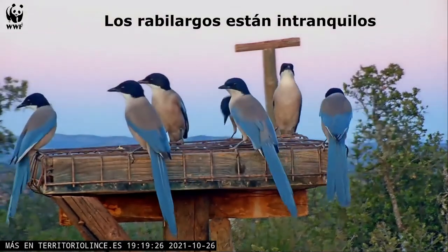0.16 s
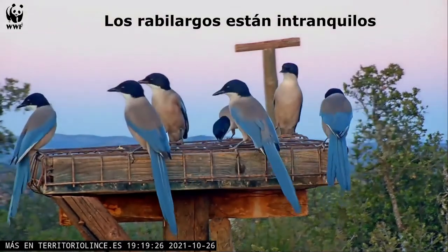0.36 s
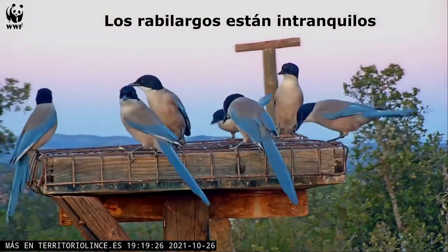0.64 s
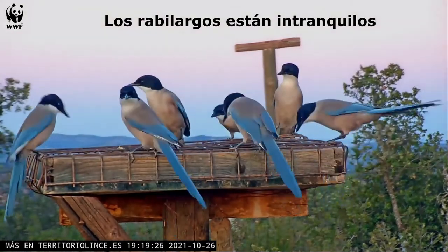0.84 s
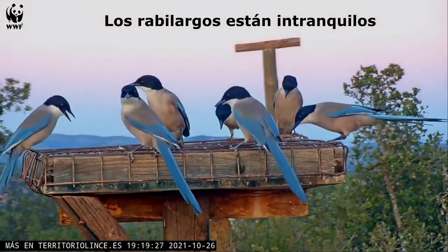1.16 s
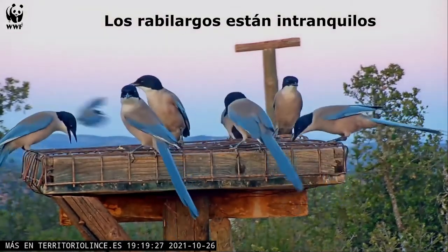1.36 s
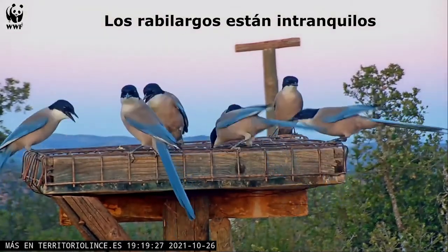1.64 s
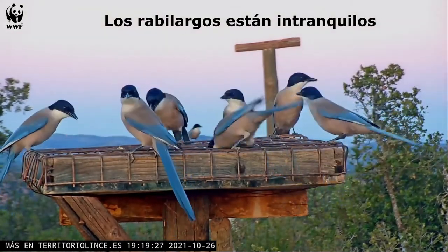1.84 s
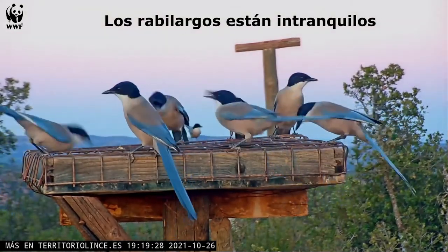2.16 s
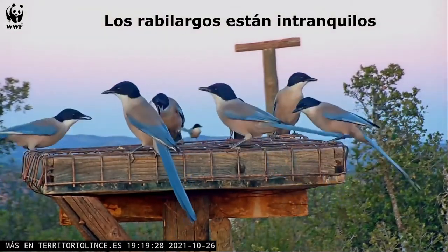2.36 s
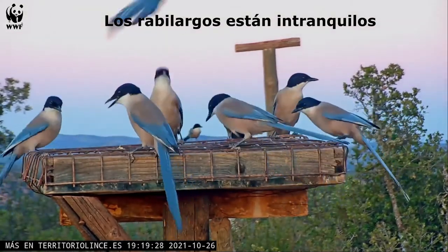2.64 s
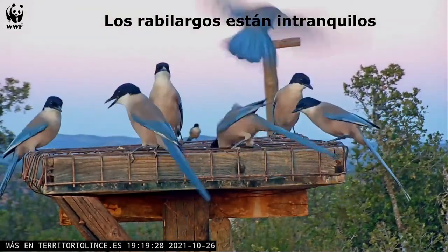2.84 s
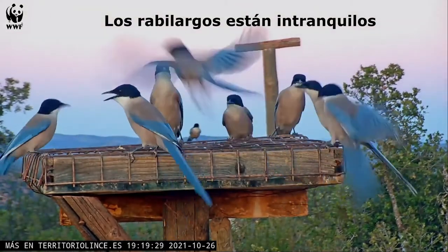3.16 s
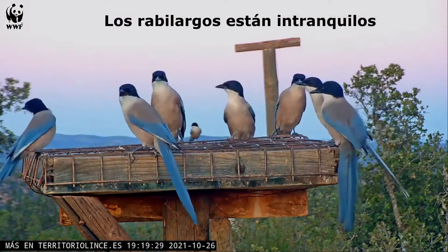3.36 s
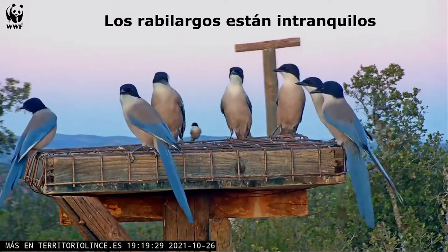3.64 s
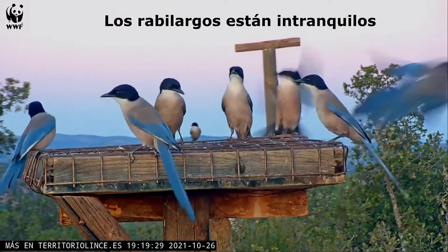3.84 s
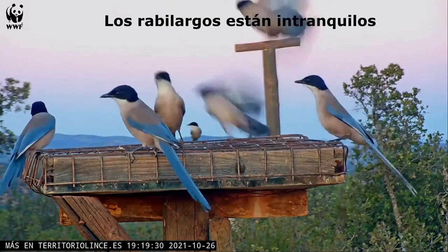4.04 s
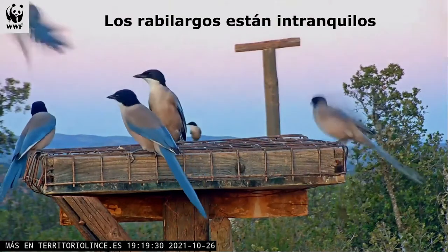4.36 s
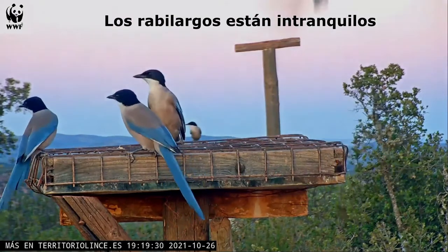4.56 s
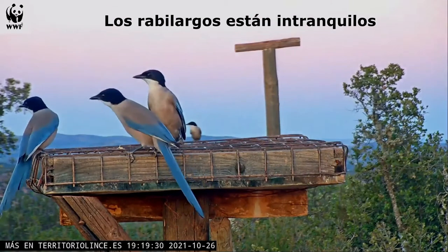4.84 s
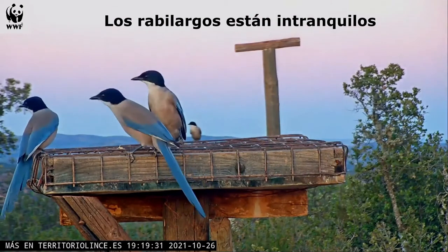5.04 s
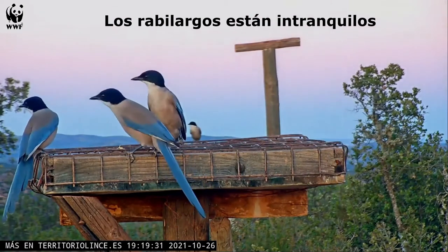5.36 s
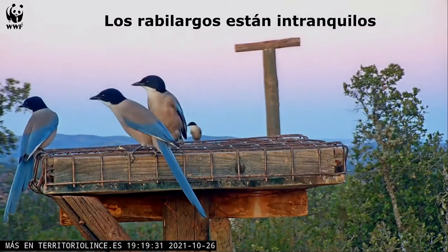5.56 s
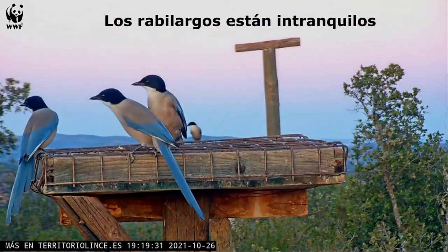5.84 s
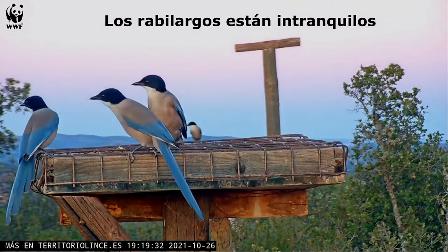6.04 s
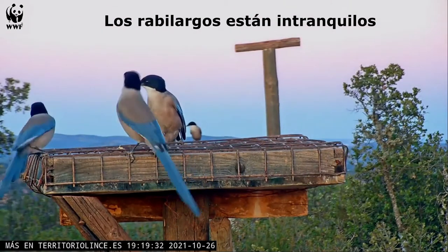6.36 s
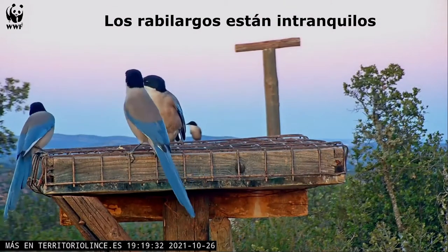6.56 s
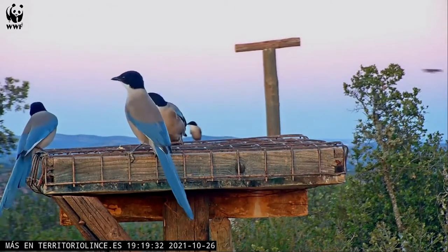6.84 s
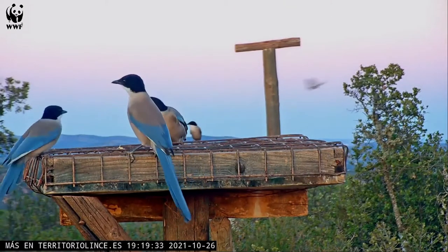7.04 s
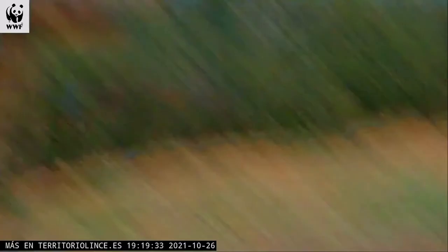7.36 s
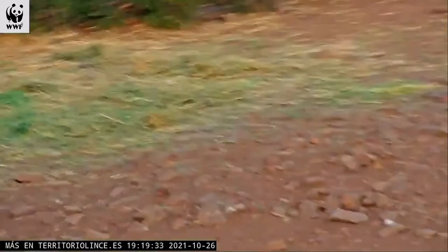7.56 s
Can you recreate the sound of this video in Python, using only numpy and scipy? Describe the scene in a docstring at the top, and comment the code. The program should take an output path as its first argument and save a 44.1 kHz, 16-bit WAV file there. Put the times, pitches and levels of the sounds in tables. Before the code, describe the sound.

Several magpies at a wooden feeder in open country give harsh rattling alarm calls, throbbing about sixty times a second. Faint far calls come first, then loud near ones. The sound cuts out briefly near three seconds and returns with a click. After a quieter pause around five and a half seconds, loud rasps resume with dull thuds of feet and wings on wood. Close microphone, narrow slightly squashed sound, little deep bass.

```python
"""Open country with a wooden feeder: a flock of magpies gives harsh alarm calls, loud near ones and faint far ones.
The calling is chopped into about sixty throbs a second: wavering sine notes over a wide rasp, which is
pulses and noise through resonances. Small birds tick and feet and wings thud on the tray, both as puffs of noise.
Banded hiss makes the air, low noise the stir of wings and breeze; the sound link drops out once."""
import sys
import numpy as np
from scipy import signal
from scipy.io import wavfile

SR = 44100
rng = np.random.default_rng(int(sys.argv[2]) if len(sys.argv) > 2 else 0)


def dump(signal):
    """Clip the signal to [-1, 1] and save it as 16-bit WAV at the path in sys.argv[1]."""
    limited = np.clip(np.atleast_2d(signal).T, -1, 1)
    pcm = np.round(limited * 32767).astype(np.int16)
    wavfile.write(sys.argv[1], SR, pcm)


N = 339570


def from_db(db):
    """Gain of a level in dB."""
    return 10 ** (np.asarray(db) / 20)


def rms_one(x):
    """Scale to rms 1."""
    return x / np.sqrt(np.mean(x ** 2) + 1e-20)


def band(x, low_hz, high_hz, order=2):
    """Butterworth band-pass."""
    return signal.sosfilt(signal.butter(order, [low_hz, high_hz], "band", fs=SR, output="sos"), x)


def drift(rate_hz, size):
    """Slow random wandering with rms 1: white noise through two equal one-pole low-passes."""
    r = np.exp(-2 * np.pi * rate_hz / SR)
    white = rng.standard_normal(size + 9000)
    return rms_one(signal.lfilter([1], [1, -2 * r, r * r], white)[9000:])  # skip the run-in


def resonate(x, modes):
    """Parallel resonances (Hz, width in Hz, dB) with alternating signs."""
    out = 0
    for k, (hz, width_hz, db) in enumerate(modes):
        r = np.exp(-np.pi * width_hz / SR)
        poles = [1, -2 * r * np.cos(2 * np.pi * hz / SR), r * r]
        zeros = [(1 - r * r) / 2, 0, (r * r - 1) / 2]
        out = out + (-1) ** k * from_db(db) * signal.lfilter(zeros, poles, x)
    return out


def air():
    """Steady far hiss in third-octave bands, each wavering a little."""
    # Spectrum of the open country. Each row: frequency in Hz, relative density in dB per Hz.
    spectrum = [(35, -52.5), (60, -29), (227, 0.5), (371, -8.5), (420, -10.5), (494, -6.5), (775, -23.5),
                (842, -23), (1140, -6), (1320, -6.5), (3460, -4), (5530, -12), (7080, -22), (8000, -42.5),
                (10400, -62), (17600, -120)]
    level_db = -51
    hz, db = np.transpose(spectrum)
    white = rng.standard_normal((2, N))
    edges_hz = 50 * 2 ** np.arange(0, 7.5, 1 / 3)
    out = 0
    for k, (low, high) in enumerate(zip(edges_hz, edges_hz[1:])):
        # drawn at every 40th sample, so it wanders 40 times slower
        waver = np.interp(np.arange(N) / 40, np.arange(N // 40 + 1), drift(300, N // 40 + 1))
        gain_db = np.interp(np.log(low * high) / 2, np.log(hz), db) + 1.2 * waver
        out = out + from_db(gain_db) * band(white[k % 2], low, high)  # neighbours use separate noise
    return from_db(level_db) * rms_one(out)


def stirred_air():
    """Lumpy low rumble and flutter on the microphone: two noise bands that share their slow swells."""
    # Air stirred by wings and breeze. Each row: time in seconds, rumble level in dB, flutter level in dB.
    stir = [(0.0, -79, -62), (1.85, -79, -59.5), (1.99, -99, -60), (2.16, -81, -61.5), (2.801, -74.5, -52),
            (3.7, -86, -63), (4.111, -83.5, -54.5), (5.5, -67, -61.5), (6.35, -57, -59),
            (6.9, -57.5, -45.5), (7.4, -79, -61), (7.56, -99, -78), (7.7, -71, -49)]
    s, rumble_db, flutter_db = np.transpose(stir)
    t = np.arange(N) / SR
    lumps_db = 3 * drift(30, N)
    rumble_gain = from_db(np.interp(t, s, rumble_db) + lumps_db)
    rumble = rumble_gain * rms_one(band(rng.standard_normal(N), 65, 350))
    flutter_gain = from_db(np.interp(t, s, flutter_db) + lumps_db + 1.0 * drift(60, N))
    flutter = flutter_gain * rms_one(band(rng.standard_normal(N), 170, 398))
    return rumble + flutter


def membranes(size):
    """Uneven pulses of the vibrating membranes, mixed with breath noise."""
    voice_hz, rough = 570, .7  # mean pulse rate; breath noise as share of the power
    wander = 1 + .06 * drift(60, size) + .1 * drift(900, size)
    cycles = np.cumsum(voice_hz * wander) / SR
    pulses = np.diff(np.floor(cycles), prepend=0) * from_db(1.5 * rng.standard_normal(size))
    return np.sqrt(1 - rough) * rms_one(pulses) + np.sqrt(rough) * rng.standard_normal(size)


def throb_shape(count, late, length):
    """Bell that opens fast in every throb and closes more slowly; count, late and length in throbs."""
    off = (count - late + 0.46) % 1 - .4  # throbs away from the peak
    return np.exp(-.5 * (off / (length * np.where(off < 0, .7, 1.1))) ** 2)


def notes(count, along, waver, pitch0_hz, pitch1_hz, top0_hz, top1_hz, below_db, above_db, length, *columns):
    """Lead note, two side notes and voice overtones in every throb, each a little off and hoarsely grained."""
    late_all, late_spread = -.05, .05  # place of the notes and their scatter, in throbs
    sweep_mid_hz, sweep_half_hz = 3000, 710  # band through which each throb sweeps upward
    overtones_db = -4  # against the lead note, before their fall on either side of it
    *sides, late_per_khz = columns

    pitch_hz = pitch0_hz + (pitch1_hz - pitch0_hz) * along
    top_hz = top0_hz + (top1_hz - top0_hz) * along
    tones = [(top_hz, 0)]
    for hz, db0, db1 in np.reshape(sides, (2, 3)):
        tones.append((np.full_like(along, hz), db0 + (db1 - db0) * along))
    for multiple in range(3, 12):
        khz = (multiple * pitch_hz - top_hz) / 1000  # distance from the lead note
        fall_db = np.where(khz < 0, below_db * khz, -above_db * khz)
        tones.append((multiple * pitch_hz, overtones_db + fall_db))

    out = 0
    for hz, db in tones:
        sweep_khz = np.clip(hz.mean() - sweep_mid_hz, -sweep_half_hz, sweep_half_hz) / 1000
        late = late_all + late_per_khz * sweep_khz + late_spread * rng.standard_normal()
        turn = (count - late + 1.393).astype(int)  # index of the throb
        off_pitch, off_db = rng.standard_normal((99, 2))[turn].T
        unsteady = waver * (.45 * off_pitch + 1.1 * drift(600, len(count)))
        grain_db = 3.5 * drift(220, len(count))
        gain = from_db(db + 1.2 * off_db + grain_db) * throb_shape(count, late, max(length, .05))
        wavering_hz = hz + unsteady * np.minimum(hz, sweep_mid_hz)
        out = out + gain * np.sin(2 * np.pi * np.cumsum(wavering_hz) / SR)
    return out


def calling(first, end, rate0, rate1, rate2, start_db, peak_db, end_db, peak_at, treble_db, body_db,
            between0_db, between1_db, *columns):
    """One stretch of calling, notes and rasp let through in throbs, at times with another bird through it."""
    # Resonances alike in every bird: low body in the windpipe, windpipe with open beak, upper ones.
    # Each row: frequency in Hz, width in Hz, level in dB.
    windpipe = [(960, 540, -14), (1910, 580, 1.5)]
    beak = [(2370, 840, -7.5), (3020, 1140, 10), (4530, 1420, 1)]
    upper = [(5070, 1400, -2), (6700, 800, 1.86), (7123, 580, -2)]
    attack_s, release_s = 0.0041, .0061  # the stretch sets in and runs out
    chest_db = -40.5  # chest thump against the level
    # stretches fainter than near_db come from far and waver more in pitch, per dB
    near_db, waver_near, waver_per_db = -30, .028, .0018
    *throat, rasp_db, brighten_db = columns

    start = max(round((first - .005) * SR), 0)
    t = np.arange(start, min(round((end + 0.059) * SR), N)) / SR
    along = np.clip((t - first) / (end - first), 0, 1)
    level_db = np.interp(along, [0, np.clip(peak_at, .05, .95), 1], [start_db, peak_db, end_db])
    rate = np.interp(along, [0, .5, 1], [rate0, rate1, rate2])
    count = np.cumsum(rate) / SR + (t[0] - first) * rate0  # throbs since the first
    gate = rms_one(throb_shape(count, -0.083, 0.23))
    sounding = np.minimum((t - t[0]) / attack_s, 1) * np.exp(-np.maximum(t - end, 0) / release_s)

    between_db = between0_db + (between1_db - between0_db) * along
    voice = membranes(len(t)) * (gate + from_db(between_db))
    low = from_db(body_db) * rms_one(band(resonate(voice, windpipe), 790, 2600))
    rasp = from_db(rasp_db) * (rms_one(band(resonate(voice, beak), 2000, 4900)) + low)
    waver = waver_near + waver_per_db * max(near_db - peak_db, 0)
    body = rms_one(notes(count, along, waver, *throat) + rasp)
    treble_gain = from_db(treble_db + brighten_db * (along - .5))
    treble = treble_gain * rms_one(band(resonate(voice, upper), 3500, 10000))
    chest = from_db(chest_db) * rms_one(band(rng.standard_normal(len(t)) * gate, 260, 430))

    out = np.zeros(N)
    out[start:start + len(t)] = from_db(level_db) * sounding * (body + treble + chest)
    return out


def small_birds():
    """Short thin ticks: a dying puff of noise in a high resonance and a weaker one below it."""
    # Ticks of small birds. Each row: start in seconds, peak level in dB, resonance in Hz,
    # time to die by 60 dB in seconds.
    ticks = [(3.8232, -21.5, 4250, 0.021), (3.835, -28.5, 5600, 0.03), (3.868, -34.5, 6620, 0.027),
             (5.5944, -39, 6400, 0.021), (5.8142, -37, 6300, 0.015)]
    out = np.zeros(N)
    t = np.arange(round(.06 * SR)) / SR
    for s, db, hz, t60 in ticks:
        puff = rng.standard_normal(len(t)) * from_db(-60 * t / t60) * np.minimum(t / 0.00059, 1)
        tick = resonate(puff, [(hz, 900, 0), (hz * 0.58, 1200, -6)])
        out[round(s * SR):][:len(t)] += from_db(db) * tick / np.abs(tick).max()
    return out


def thuds():
    """Dull knocks: a dying puff of noise in the wide resonance of the wooden tray."""
    # Feet and wings thud on the feeder. Each row: start in seconds, peak level in dB.
    knocks = [(6.327, -49), (6.539, -55), (6.611, -33.5), (6.69, -38), (6.804, -29), (6.918, -29),
              (7.034, -28.5), (7.102, -34), (7.187, -46)]
    tray_hz, t60_s = 300, .06
    out = np.zeros(N)
    t = np.arange(round(.1 * SR)) / SR
    for s, db in knocks:
        puff = rng.standard_normal(len(t)) * from_db(-60 * t / t60_s) * np.minimum(t / 0.0014, 1)
        thud = band(puff, tray_hz * .5, tray_hz * 2)
        out[round(s * SR):][:len(t)] += from_db(db) * thud / np.abs(thud).max()
    return out


def scene():
    """Calling and ticks with a few dull echoes, over thuds and air."""
    # Rhythm of each stretch of calling; a long call may take several rows.
    # Each row: first throb in seconds, end in seconds, throbs per second at the start, middle and end.
    rhythms = [ (0.0056, 0.42, 59.91, 60.57, 61.13), (0.4439, 0.855, 59.28, 61.61, 59.23),
               (0.8675, 1.375, 53.6, 53.85, 54.1), (1.3867, 1.48, 54.2, 54.3, 54.4),
               (1.4936, 2.25, 54.95, 56.46, 53.18), (2.2543, 2.385, 61.85, 58.67, 56.88),
               (2.3942, 2.93, 61.76, 60.88, 62.47), (3.0935, 3.37, 61.65, 61.14, 60.53),
               (3.3727, 3.79, 61.77, 62.17, 54.95), (4.0249, 4.17, 52.64, 56.46, 55.7),
               (4.1832, 4.9, 59.15, 57.74, 56.47), (4.9096, 5.195, 66.36, 64.15, 55.5),
               (5.9388, 6.44, 54.46, 56.21, 57.11), (6.4545, 6.78, 62.19, 62.1, 63.0),
               (6.7918, 7.135, 65.01, 64.29, 61.17), (7.1447, 7.42, 60.25, 59.02, 57.53),
               (7.4321, 7.7, 62.06, 61.26, 60.9), ]
    # Effort and voice of each stretch of calling; side notes and fill may be another bird.
    # Each row: level at start, peak point and end in dB, place of the peak point as share of the stretch,
    # treble against the level in dB, low body against the rasp in dB,
    # steady rasp that fills between the throbs at start and end in dB,
    # voice pitch at start and end in Hz, lead note at start and end in Hz,
    # fall of the overtones below and above the lead note in dB per kHz, note length in throbs,
    # second note in Hz, its level at start and end in dB, third note in Hz, its level at start and end in dB,
    # lateness of higher notes in throbs per kHz, wide rasp against the lead note in dB,
    # change of the treble over the stretch in dB.
    voices = [ (-42.5, -40, -38, 0.46, -42, -14, -12, -3.5, 575, 580, 3670, 3360, 5.5, 13, 0.21, 4560, -9, -1, 2900, -10, -8, .03, -1, -6),
              (-38.5, -35.5, -38, 0.56, -36, -15, -6, -6, 590, 660, 3400, 3000, 8, 11, 0.14, 4580, -9, -17, 2000, -22, -16, .03, -5, -5),
              (-34.5, -30.5, -30.5, 0.3, -17, -12, -17, -9, 510, 630, 3740, 4000, 8, 6.5, 0.093, 2354, 0, -9, 2750, -7, -0.5, .03, -5, -2),
              (-22, -26, -26, .5, -16.5, -12.5, -9, -1, 620, 510, 3400, 3300, 12, 14, 0.085, 2740, 3, -4.5, 3100, -5, -4, .03, -1, -5),
              (-31.5, -28.5, -33, 0.84, -16.5, -11.5, -4.5, 1, 570, 600, 2660, 2910, 21, 14, 0.15, 3800, -22, 0.5, 4960, -11, -18.5, .05, -2.5, -5.5),
              (-40, -40.5, -41, 0.57, -35, -11, -1, 0, 690, 580, 3430, 3650, 9, 11.5, 0.31, 2650, -9, -7, 4300, -15, -14, .1, -2.5, 0),
              (-24, -17.5, -18.5, 0.25, -15, -15.5, -15.5, 1.5, 775, 759.2, 3060, 3060, 13, 9.5, 0.17, 3880, -3.5, 0, 2345, -9.5, -15.5, .1, -2.5, -4.5),
              (-15, -16.5, -17.5, 0.56, -18, -15, 7.5, 7.5, 800, 700, 3200, 2850, 19, 12.5, 0.3, 3750, -4.5, -3, 3400, -8, -5, .2, -3.5, -2),
              (-20, -19, -34.5, 0.87, -24.5, -12.5, -4.5, -2.5, 510, 560, 3340, 3300, 17, 10.5, 0.2, 2740, 0, -0.5, 1770, -20.5, -17.5, 0.6, -12.5, -5),
              (-40.5, -42.5, -39.5, 0.65, -27, -9, -10, -1, 582, 590, 3650, 3600, 17, 14, .2, 2540, -10, -15, 3800, -12, -14, .02, -5.5, -6),
              (-24.5, -20, -21.5, 0.25, -12.5, -9, -11, -4.5, 590, 590, 2900, 2780, 11.5, 3.5, 0.17, 2335, -1, -8.5, 3850, -7, -6, .05, -4.5, -1.5),
              (-34.5, -36, -45.5, 0.74, -28, -9, 4, 1, 720, 720, 3650, 3560, 12, 29, 0.35, 2800, -6, -4, 3200, -6, -1, .03, -3.5, -6),
              (-41, -36, -37, 0.36, -48, -12.5, -17, 5, 570, 550, 3270, 3750, 30, 17, 0.17, 3950, -8, -8, 2700, -21, -18, .1, -7.5, -5),
              (-24, -17.5, -17.5, 0.59, -18, -13.5, -5.5, -6.5, 500, 575, 2750, 2950, 17, 8.5, 0.12, 3250, -4, 0, 4200, -14, -1.5, .1, -7, 9),
              (-17, -17.5, -31.5, 0.95, -17.5, -12, -4.5, -1.5, 565, 540, 4080, 3550, 12.5, 19, 0.22, 2830, -12, -0.5, 2035, -15, -15, .2, -7, -3),
              (-32, -29, -26.5, 0.74, -27, -12.5, 1, -1, 610, 720, 3400, 3360, 6.5, 8, 0.11, 4630, -2.5, -3, 2520, -9.5, 0, .02, -2, -2),
              (-23, -19.5, -20, 0.52, -16.5, -14.5, -9, -0.5, 720, 745, 3600, 3600, 4, 16, 0.35, 2900, -5, 1, 2380, -10, -6, .05, 0.5, 1),
              ]
    # Echoes off feeder, ground and trees. Each row: delay in seconds, level in dB.
    echoes = [(.0021, -25.5), (.0068, -16.5), (.019, -11.5), (.037, -32)]
    magpies = sum(calling(*rhythm, *voice) for rhythm, voice in zip(rhythms, voices))
    birds = magpies + small_birds()
    dull = band(birds, 600, 4300, order=1)
    for delay, db in echoes:
        lag = round(delay * SR)
        birds[lag:] += from_db(db) * dull[:N - lag]
    return (birds + thuds() + air() + stirred_air())[None]


def record(dry):
    """A narrow sound link without deep bass rounds the peaks and falls silent once; a click ends the gap."""
    limit = .58  # highest swing into the filters of the link
    gap_start_s, gap_end_s, click_db = 2.9295, 3.0892, -20
    t = np.arange(N) / SR
    rounded = limit * np.tanh(dry / limit)
    link = signal.sosfilt(signal.butter(3, 100, "high", fs=SR, output="sos"), rounded)
    link = signal.sosfilt(signal.cheby2(14, 50, 8350, fs=SR, output="sos"), link)
    # drops by 18 dB at once, then dies within milliseconds
    fading = from_db(-18) * np.exp(-np.maximum(t - gap_start_s, 0) / .004)
    link = link * np.where((t > gap_start_s) & (t < gap_end_s), fading, 1)
    # second difference of a single sample: a click without bass
    click = np.diff(np.arange(N) == round(gap_end_s * SR), prepend=0, n=2, append=0)
    low_pass = signal.cheby2(12, 70, 14500, fs=SR, output="sos")
    return signal.sosfilt(low_pass, link + from_db(click_db) * click)


dry = scene()
out = record(dry)
dump(out)
```